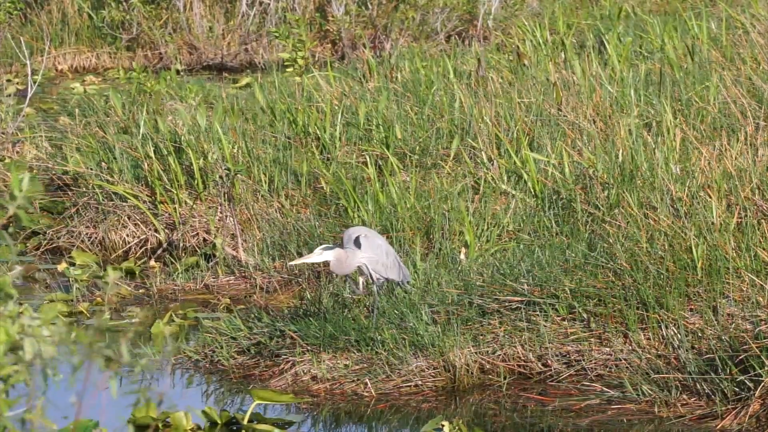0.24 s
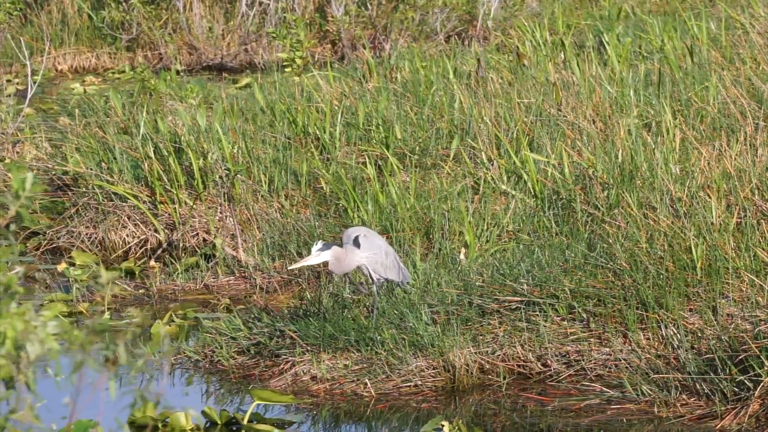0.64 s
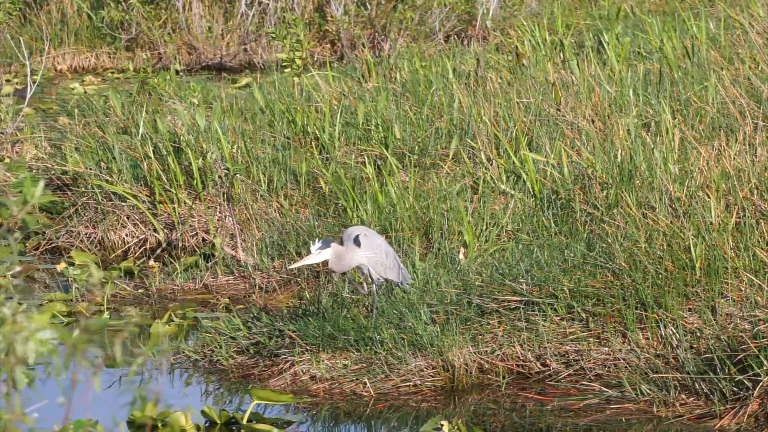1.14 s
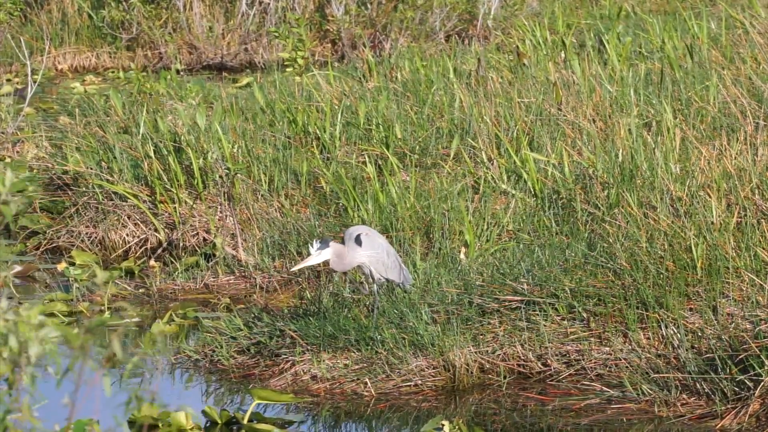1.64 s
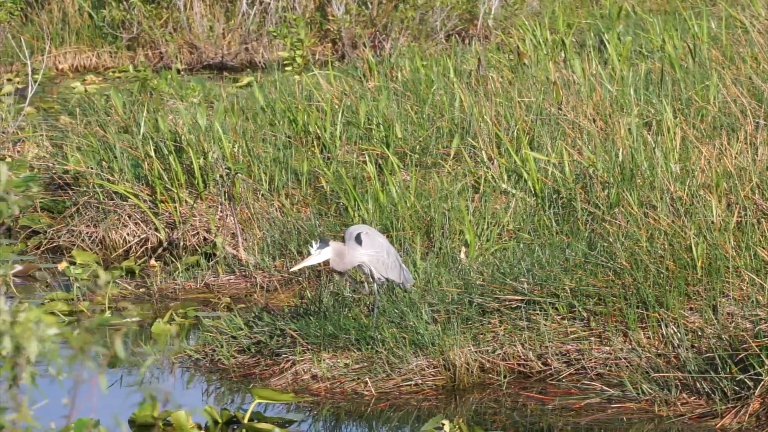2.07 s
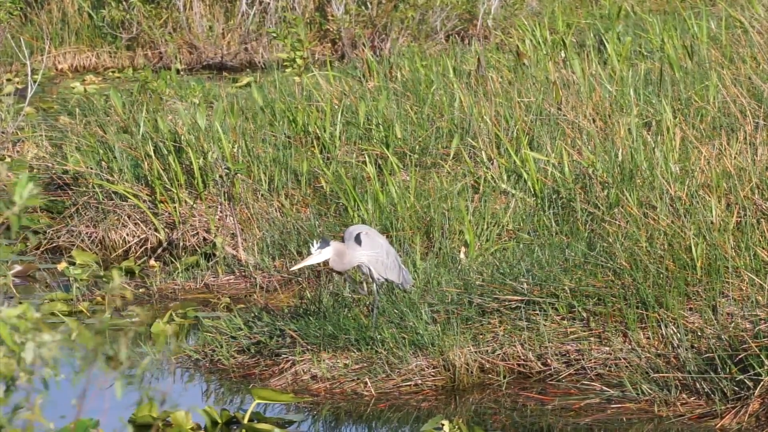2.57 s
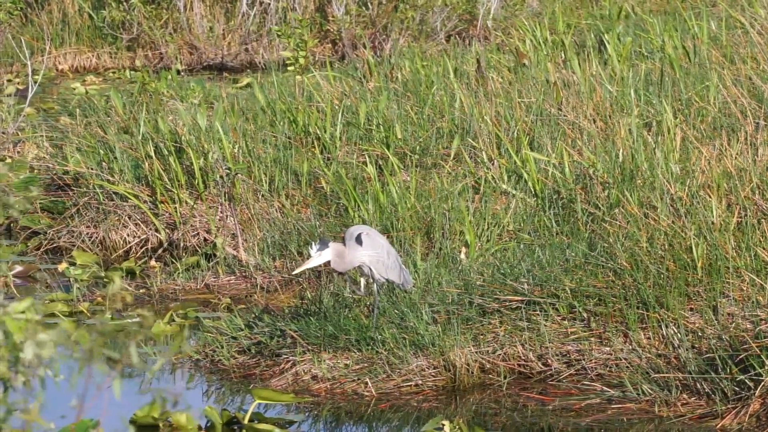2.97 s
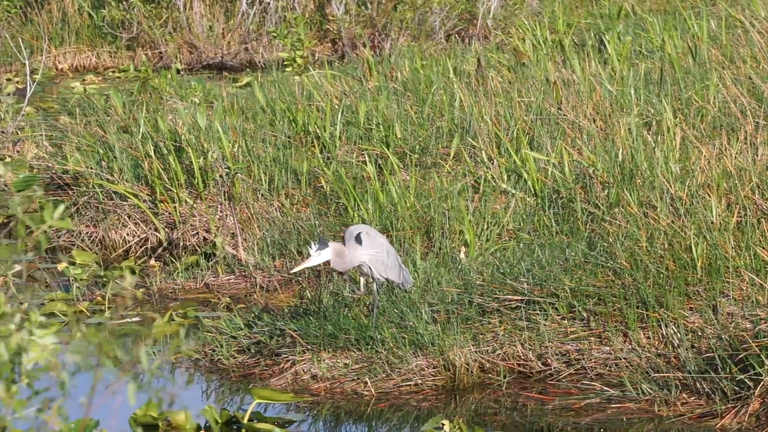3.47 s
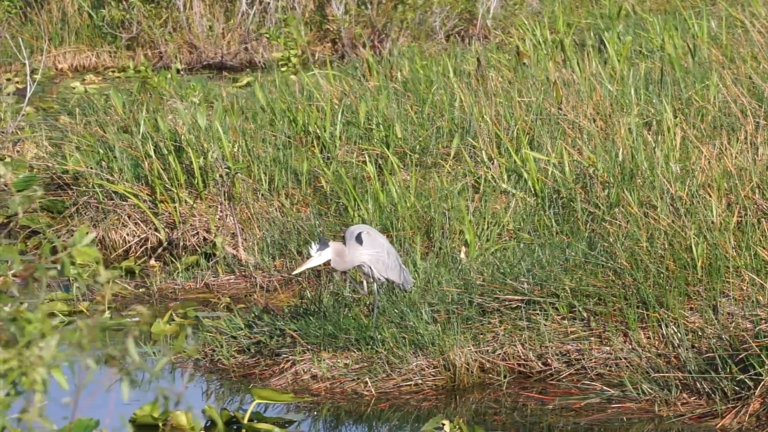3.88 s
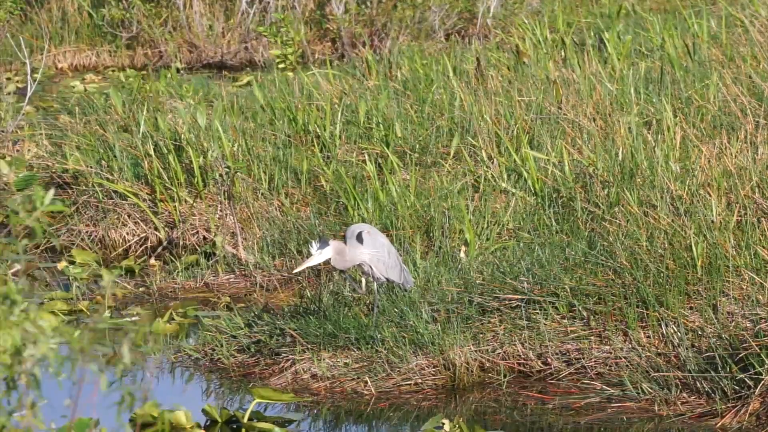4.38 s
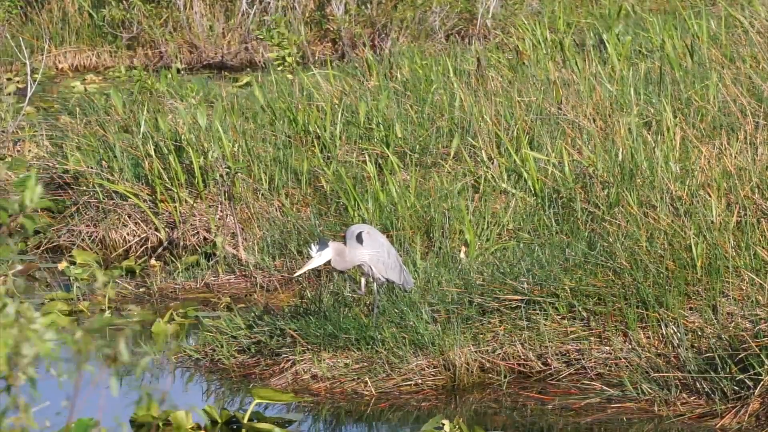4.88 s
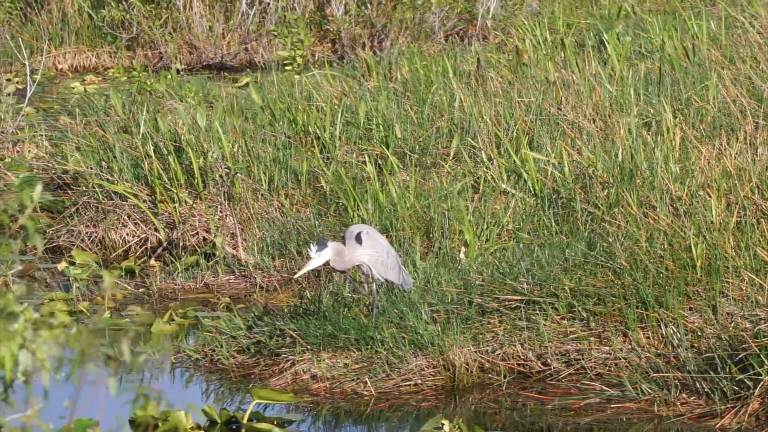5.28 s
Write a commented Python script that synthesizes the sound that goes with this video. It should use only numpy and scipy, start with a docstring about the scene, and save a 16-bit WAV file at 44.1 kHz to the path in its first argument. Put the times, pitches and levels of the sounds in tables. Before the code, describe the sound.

A sunny reed marsh with soft air noise, a continuous cricket trill near 4 kHz and a faint, wavering far engine, slightly stronger at first. A frog cluck starts it, then two nasal waterbird whines swing upward at about 0.2 and 0.55 seconds, followed by weaker reedy notes to 1.5. Small-bird chips, thin whistles with a downward hook, come every quarter to third of a second until 3.9, loudest near 2.5. High raspy buzzes cluster around 0.5, 1.5 and 2.3-2.5, with tiny peeps and chatter between. Short waterbird notes sound near 2.2-2.4, 3.1 and 4.0; another frog clucks at 3.1 and 4.3. The loudest call, a harsh falling wail, bursts at 4.4-4.65, trailing into a weaker wail until 5.1. Breeze then bumps the microphone in low thuds, strongest near 4.86 and 5.44, with a last nasal note at 5.46. Reeds smear the calls briefly.

```python
"""Marsh by day

Gallinules whine and wail in the reeds as sets of harmonics with one picked out by the throat.
Small birds chip and buzz, and short glides peep and chatter, all as gliding sines; a frog clucks
now and then as a brief ringing. A cricket chorus of pulsed tones trills near 4 kHz, a far engine
drones as wavering low lines, and the breeze, mostly late on, bumps the microphone over shaped noise.
The reed bed scatters the calls into short smears of echoes."""
import sys
import numpy as np
from scipy import signal
from scipy.fft import rfft, irfft
from scipy.io import wavfile
from scipy.ndimage import uniform_filter1d, map_coordinates

SR = 44100
rng = np.random.default_rng(int(sys.argv[2]) if len(sys.argv) > 2 else 0)


def unload_audio(sound):
    """Save the sound as a 16-bit wav file, at the path given as the first command line argument."""
    columns = np.transpose(np.atleast_2d(sound))
    # keep every value between -1 and 1, then stretch to whole-number steps
    steps = np.round(np.clip(columns, -1, 1) * 32767)
    wavfile.write(sys.argv[1], SR, steps.astype(np.int16))


N = 243431
T = np.arange(N) / SR  # s

# rising gallinule whines: middle of the rise t/s, low f/Hz, high f/Hz, echo level/dB,
# pitch jitter/share, levels of harmonics 2-5/dB
RISES = [(0.2, 446.6, 596.3, -5.5, 0.016, (-46, -27, 0, -20)),
         (.556, 449, 594.5, -3, 0.021, (-28, -19, 0, -20.5))]
# loudness of each rising whine: t/s, level/dB
RISE_LEVELS = [
    [(0.09, -52), (0.108, -36.5), (0.136, -61), (0.154, -35.5), (0.182, -46), (0.204, -30.5),
     (0.258, -32.5), (0.304, -41), (0.338, -29.5), (0.355, -49)],
    [(0.46, -49.5), (0.488, -58), (0.516, -45.5), (0.548, -52), (0.566, -33.5), (0.6, -46), (0.616, -33),
     (0.676, -49), (0.69, -38), (0.73, -54)],
]
# falling gallinule wails: start f/Hz, end f/Hz, how fast the tone turns pure/(1/s), echo level/dB,
# pitch jitter/share, levels of harmonics from the 2nd up/dB
FALLS = [(918, 585, 2.5, -17, 0.0045, (-15, 0, -25, -24)),
         (640.7, 503, 10, -6.5, .011, (-9.5, -16, 0, -11, -23)),
         (800, 585, 0.5, -13.5, 0.0067, (-15.5, 0, -23, -31))]
# loudness of each falling wail: t/s, level/dB
FALL_LEVELS = [[(3.57, -59), (3.602, -36), (3.686, -67), (3.734, -42), (3.804, -65.5),
               (3.97, -57.5)] + [(4.0, -47), (4.07, -71)], [(4.418, -54), (4.426, -33), (4.476, -19.5),
               (4.482, -31), (4.504, -30), (4.514, -22), (4.548, -30.5), (4.562, -35.5), (4.63, -33.5),
               (4.655, -50)], [(4.655, -41), (4.755, -41), (4.795, -57), (4.823, -46.5), (4.877, -59.5),
               (4.989, -53), (5.023, -39), (5.065, -50.5), (5.115, -49.5), (5.135, -64)]]
# short gallinule notes: t/s, length/s, start f/Hz, end f/Hz, level/dB, echo level/dB,
# pitch jitter/share, levels of harmonics 2-5/dB
NOTES = [(0.743, 0.11, 666, 683, -49, -20, 0.0097, (-15, -17, 0, -2)),
         (.845, .06, 662, 682, -44.5, -8, 0.018, (-25, -24, 0, -9)),
         (1.309, .27, 796, 756, -58.5, -13, 0.0074, (-26, -14, 2, -20)),
         (2.205, 0.064, 771, 751, -39.5, -5, 0.012, (-28, -23, 0, -15)),
         (2.317, 0.059, 768, 762, -44, -7, 0.018, (-25, -16.5, 0, -23)),
         (2.395, 0.12, 730, 692, -55, -7, 0.012, (-28, -20, 0, -13)),
         (3.141, 0.083, 620, 596, -29.5, -13.5, 0.0081, (-44, -39, 0, -47)),
         (3.983, 0.053, 612, 586, -33, -16, 0.0066, (-41, -35, 0, -38)),
         (4.033, 0.031, 617, 599, -31, -7.5, 0.011, (-44, -37, 0, -38)),
         (5.146, 0.096, 712, 677, -52.5, -4, 0.02, (0, -11, -7, -22)),
         (5.464, .09, 658, 604, -31.5, -11, .009, (-18, -5.5, -1, -25))]
# hooked chips of a small bird: end t/s, f before the hook/Hz, level/dB
CHIPS = [(.344, 3840, -43), (.657, 3694, -34), (.942, 3700, -40), (1.770, 3705, -34), (2.014, 3650, -34.5),
         (2.249, 3550, -40.5), (2.478, 3660, -25), (2.725, 3624, -39.5), (3.019, 3670, -45.5),
         (3.355, 3710, -49), (3.667, 3734, -41), (3.922, 3700, -47)]
# slurs of the same bird: t/s, length/s, start f/Hz, end f/Hz, level before the swell shape/dB
SLURS = [(1.077, 0.078, 3960, 2750, -32), (2.133, 0.015, 3740, 2990, -37)]
# syllables of a high buzzing bird: t/s, length/s, middle f/Hz, level before the swell shape/dB
BUZZES = [(0.445, 0.046, 5700, -42), (0.493, 0.074, 5820, -42.5), (.745, 0.012, 5450, -44),
          (1.439, 0.028, 5810, -38.5), (1.496, 0.051, 5580, -38), (1.523, 0.036, 5900, -50),
          (2.261, .012, 5590, -48), (2.284, 0.0091, 5400, -55), (2.459, 0.038, 5900, -40),
          (2.517, 0.029, 6300, -42), (2.537, 0.041, 5740, -42.5), (5.11, 0.026, 6260, -55.5),
          (0.767, 0.099, 5540, -65), (2.296, 0.076, 5600, -63)]
# frog clucks: t/s, f/Hz, peak level/dB, decay/s
CLUCKS = [(0.035, 1620, -23, 0.0011), (3.1086, 1606, -34, 0.0017), (4.316, 1483, -31.5, 0.0027)]
# short glides: peeps, chatter, and strands of the gallinule calls: t/s, length/s, start f/Hz, end f/Hz,
# level before the swell shape/dB
GLIDES = [(.006, 0.018, 2790, 2370, -41), (.197, 0.043, 2720, 2720, -41.5), (0.38, 0.021, 3410, 3470, -46),
          (0.437, 0.0076, 3030, 3450, -40.5), (0.769, 0.0051, 3200, 3430, -34),
          (.783, 0.0091, 3270, 3460, -31), (0.797, 0.0089, 3220, 3310, -32), (.811, .014, 3200, 3170, -38),
          (0.87, 0.0082, 3150, 3280, -39), (1.172, 0.014, 3200, 3110, -46.5),
          (1.225, .024, 2220, 2450, -49.5), (1.342, .03, 2800, 2800, -51), (2.334, 0.054, 3330, 3330, -49),
          (3.122, .016, 2830, 2820, -50), (3.193, 0.028, 930, 1304, -46.5), (3.47, .09, 1745, 1960, -55.5),
          (3.606, .068, 1760, 1744, -47), (3.693, .01, 3140, 2970, -48.5), (3.834, .035, 3110, 2990, -52),
          (3.865, 0.016, 1485, 1390, -47.5), (3.927, 0.055, 3030, 2900, -50.5),
          (4.401, 0.054, 2080, 1980, -42), (4.635, 0.019, 1750, 1600, -43),
          (5.011, 0.034, 2055, 2130, -41.5), (5.068, 0.034, 2850, 2900, -49), (5.15, 0.03, 2840, 2780, -51),
          (5.344, 0.037, 3380, 3520, -52)]
# breeze bumping the microphone: t/s, f/Hz, peak level between the two sides/dB, half length/s
BUMPS = [(0.056, 114, -33, .015), (1.926, 70, -47, 0.0048), (2.949, 81, -33.5, 0.008),
         (3.004, 88, -32.5, 0.0095), (3.823, 79.5, -32.5, 0.011), (4.574, 60, -32, 0.013),
         (4.863, 94, -18, 0.0076), (4.904, 104, -28, 0.012), (4.97, 85, -30.5, 0.0042),
         (5.016, 100.2, -25.5, 0.0045), (5.051, 84, -25.5, 0.015), (5.237, 88.5, -31, 0.0086),
         (5.362, 91, -27, 0.0076), (5.442, 82.5, -21.5, 0.004), (5.496, 84, -28.5, 0.02)]
# far engine, once settled: f/Hz, rms level/dB
DRONE = [(83.5, -53), (117, -49), (233, -53), (249, -53.5)]
# level of the background but for the engine, rising around loud calls,
# used relative to its median: t/s, level/dB
BACKGROUND_LEVEL = [(0.0, -66.5), (0.01, -68.5), (0.47, -73), (0.56, -69.5), (0.95, -73.5), (2.41, -73.5),
                    (2.58, -71), (2.7, -73), (4.37, -73.5), (4.61, -67), (5.08, -75.5), (5.39, -74),
                    (5.45, -76)]
# relative spectrum of the open air: f/Hz, level per Hz/dB
AIR = [(20, -17.5), (40, -15), (60, -3), (95, 0), (130, 2), (175, -6), (275, 1.5), (370, -3), (480, -12),
       (800, -11), (1150, -16), (1800, -22), (3200, -22.5), (5300, -30), (11000, -40)]
# relative spectrum of the air that differs between the ears: f/Hz, level per Hz/dB
WIDTH = [(20, -5), (80, 8), (200, -9), (1000, 4), (2400, 1.5), (5000, -18), (11000, -27)]

RISE_S = 0.0414  # time scale of the swing up in a whine
SCOOP_SHARE, SCOOP_S = 0.0805, 0.0049  # wails and notes start this far flat and slide up
# a note swells from and sinks to the edge level, relative to its own
NOTE_ATTACK_S, NOTE_RELEASE_S, NOTE_EDGE_DB = 0.011, 0.014, -11.5
# a chip swells, holds and stops short, while its pitch sags and ends in a hook
CHIP_ATTACK_S, CHIP_HOLD_S, CHIP_RELEASE_S, CHIP_EDGE_DB = 0.02, 0.021, 0.008, -18.5
CHIP_SAG_HZ_PER_S, CHIP_HOOK_HZ, CHIP_HOOK_S = 2880, 640, 0.0038
CRICKET_HZ, CRICKET_SPREAD_HZ = 3957, 215
CRICKET_DB, AIR_DB, WIDTH_DB = -50.5, -43.5, -71  # rms before the background level moves them
TOP_HZ = 11100


def undb(db):
    """Decibels to gain."""
    return 10 ** (np.asarray(db) / 20)


def unit(x):
    """Scale to rms 1."""
    return x / np.sqrt(np.mean(x ** 2))


def walk(rate):
    """Smooth random wander of rms 1, through rate random points a second."""
    points = rng.standard_normal(4096)
    return unit(map_coordinates(points, [T * rate], order=2, mode='wrap'))


def turn(hz):
    """Phase of a moving frequency."""
    return 2 * np.pi * np.cumsum(hz) / SR


def track(rows):
    """Sample indices, pitch and gain along rows (t/s, f/Hz, level/dB), eased as a voice needs time to change."""
    s, hz, db = np.transpose(rows)
    fade_s = .003
    i = np.flatnonzero((T > s[0] - fade_s) & (T < s[-1] + fade_s))
    t = T[i]
    ends = np.clip(np.minimum(t - s[0], s[-1] - t) / fade_s + 1, 0, 1)
    pitch = uniform_filter1d(np.interp(t, s, hz), size=110)  # 2.5 ms
    gain = uniform_filter1d(undb(np.interp(t, s, db)), size=110)
    return i, pitch, np.sqrt(2) * ends * gain


def envelope(s, attack, length, release, db, edge_db):
    """Attack, hold and release as rows (t/s, level/dB)."""
    hold_end = s + max(attack, length - release)
    return [(s, db + edge_db), (s + attack, db), (hold_end, db), (s + length, db + edge_db)]


def voiced(levels):
    """Sample indices, age and gain of a call whose loudness follows rows (t/s, level/dB)."""
    i, _, gain = track([(s, 0, db) for s, db in levels])
    return i, np.maximum(T[i] - levels[0][0], 0), gain


def reeds(x, t60):
    """Echoes scattered back by countless stems, building up briefly and dying away."""
    t = T[:SR // 2]
    build = 1 - np.exp(-t / .02)
    response = rng.standard_normal(len(t)) * build * np.exp(-np.log(1000) * t / t60)
    return signal.oaconvolve(x, response / np.linalg.norm(response))[:N]


def gallinules(flutter_db=3.0, thinnest_db=-29, swing=0.78):
    """Nasal reedy calls: the throat picks out one harmonic, and the voice shakes, most in the hoarse ones."""
    direct, scattered = np.zeros((2, N))
    shake, flutter = walk(300), flutter_db * walk(130)
    for i, hz, gain, harmonics_db, purify, echo_db, jitter in gallinule_calls():
        phase = turn(hz * (1 + jitter * shake[i]))
        purity = 1 + purify * (T[i] - T[i[0]])  # a harsh start thins to the strongest harmonic
        steadier = gain.max() * (gain / gain.max()) ** swing  # harmonics off the resonance swell less
        call = 0
        for k, db in enumerate(harmonics_db, 2):
            weak = steadier * undb(np.maximum(db * purity, min(db, thinnest_db)))
            strength = gain if db == max(harmonics_db) else weak
            call = call + strength * np.sin(k * phase) * undb(flutter[i])
        direct[i] += call
        scattered[i] += undb(echo_db) * call
    return direct + reeds(scattered, .22)


def gallinule_calls():
    """Whines swing up from one pitch to another; wails and notes scoop in, then slide at an even rate."""
    for (middle, low, high, echo_db, jitter, harmonics_db), levels in zip(RISES, RISE_LEVELS):
        i, _, gain = voiced(levels)
        hz = low + (high - low) * (1 + np.tanh((T[i] - middle) / RISE_S)) / 2
        yield i, hz, gain, harmonics_db, 0, echo_db, jitter
    for (start, end, purify, echo_db, jitter, harmonics_db), levels in zip(FALLS, FALL_LEVELS):
        i, age, gain = voiced(levels)
        hz = np.linspace(start, end, len(i)) * scoop(age)
        yield i, hz, gain, harmonics_db, purify, echo_db, jitter
    for s, length, start, end, db, echo_db, jitter, harmonics_db in NOTES:
        levels = envelope(s, NOTE_ATTACK_S, length, NOTE_RELEASE_S, db, NOTE_EDGE_DB)
        i, age, gain = voiced(levels)
        hz = np.linspace(start, end, len(i)) * scoop(age)
        yield i, hz, gain, harmonics_db, 0, echo_db, jitter


def scoop(age):
    """Pitch ratio of a voice that starts flat and slides up into its note."""
    return 1 - SCOOP_SHARE * np.exp(-age / SCOOP_S)


def chipper(echo_db=-15, t60=0.3, stems_db=-10):
    """Pure whistles that sag and end in a downward hook, and two falling slurs; near stems make them flutter."""
    out = np.zeros(N)
    length = CHIP_ATTACK_S + CHIP_HOLD_S + CHIP_RELEASE_S
    for end, hz, db in CHIPS:
        levels = envelope(end - length, CHIP_ATTACK_S, length, CHIP_RELEASE_S, db, CHIP_EDGE_DB)
        i, age, gain = voiced(levels)
        sag = CHIP_SAG_HZ_PER_S * (age - CHIP_ATTACK_S - CHIP_HOLD_S / 2)
        hook = CHIP_HOOK_HZ * np.exp(np.minimum(T[i] - end, 0) / CHIP_HOOK_S)
        out[i] += gain * np.sin(turn(hz - sag - hook))
    for s, length, start_hz, end_hz, db in SLURS:
        i, hz, gain = track([(s, start_hz, db), (s + length, end_hz, db)])
        out[i] += gain * np.hanning(len(i)) * np.sin(turn(hz))
    stems = undb(stems_db) * reeds(out, 0.07)
    return out + stems + undb(echo_db) * reeds(out, t60)


def buzzer(sweep_hz=290, trill_hz=170, scatter_hz=150, droop_hz=120, echo_db=-8, t60=0.11):
    """A high whistle swept up and down so fast and unevenly that it rasps; each syllable sinks a little."""
    out = np.zeros(N)
    sweep = sweep_hz * np.sin(turn(trill_hz * (1 + 0.26 * walk(150)))) + scatter_hz * walk(700)
    for s, length, hz, db in BUZZES:
        i, pitch, gain = track([(s, hz + droop_hz, db), (s + length, hz - droop_hz, db)])
        swell = np.hanning(len(i)) ** .35
        out[i] += gain * swell * np.sin(turn(pitch + sweep[i]))
    throat = signal.butter(5, (5350, 6500), 'bandpass', fs=SR, output='sos')
    out = signal.sosfilt(throat, out * undb(3.5 * walk(320)))
    return out + undb(echo_db) * reeds(out, t60)


def frog(echo_db=-15, t60=0.14):
    """Each cluck is one push on the vocal sac, which rings for a few cycles."""
    out = np.zeros(N)
    for s, hz, db, decay in CLUCKS:
        age = np.maximum(T - s, 0)
        ring = age / decay * np.exp(1 - age / decay)  # peaks at 1
        out += undb(db) * ring * np.sin(2 * np.pi * hz * age)
    return out + undb(echo_db) * reeds(out, t60)


def short_glides(scatter_hz=60, echo_db=-10, t60=0.27):
    """Peeps, chatter and strands of the gallinule calls, slightly hoarse because their pitch wanders fast."""
    out, hoarse = np.zeros(N), scatter_hz * walk(400)
    for s, length, start_hz, end_hz, db in GLIDES:
        i, hz, gain = track([(s, start_hz, db), (s + length, end_hz, db)])
        swell = np.sqrt(np.hanning(len(i)))
        out[i] += gain * swell * np.sin(turn(hz + hoarse[i]))
    return out + undb(echo_db) * reeds(out, t60)


def crickets(count=15, echo_db=0, high_hz=4880, high_db=-69, thin_hz=5600, thin_db=-70):
    """A chorus loudest at its middle pitch and blurred by the reeds; two thinner insects sing above it."""
    chorus = 0
    for place in np.linspace(-2.4, 2.9, count):
        cricket = trill(CRICKET_HZ + CRICKET_SPREAD_HZ * place, rng.uniform(35, 60))
        chorus = chorus + np.exp(-place ** 2 / 4) * cricket
    chorus = unit(chorus + undb(echo_db) * reeds(chorus, 0.79))
    high = trill(high_hz, 39.5) * undb(3 * walk(6))
    high = unit(high + .5 * reeds(high, 0.05))
    fade_in = np.interp(T, [2.2, 3.4], [0, 1])
    thin = np.sin(turn(thin_hz + 70 * walk(300))) * fade_in
    return undb(CRICKET_DB) * chorus + undb(high_db) * high + undb(thin_db) * thin


def trill(hz, stroke_hz):
    """One cricket: each wing stroke is a short tone that sags in pitch, and the strength of strokes wanders."""
    stroke = turn(stroke_hz * (1 + .1 * walk(20))) / (2 * np.pi) + rng.random()
    cycle = stroke % 1
    strength = undb(3 * walk(30))
    pulse = np.sin(np.pi * cycle) ** 4
    pitch = hz * (1 + 0.038 * (.5 - cycle) + 0.0043 * walk(60))
    return unit(strength * pulse * np.sin(turn(pitch)))


def breeze():
    """Eddies push on the microphone as short low swings of pressure, harder on the right port."""
    out = np.zeros((2, N))
    for s, hz, db, width in BUMPS:
        offset = rng.random() + .05 * rng.standard_normal((2, 1))  # cycles, nearly alike on both sides
        push = undb(db) * np.exp(-((T - s) / width) ** 2)
        out += push * np.cos(2 * np.pi * (hz * (T - s) + offset))
    return out * undb([[-1.2], [1.2]])


def engine(wander=0.0141, fade_db=4.0, early_db=3.0, recede_s=0.9):
    """Low lines that waver and fade on their long way over the marsh, a little louder at first."""
    lines = 0
    for hz, db in DRONE:
        fade = undb(fade_db * walk(8.3))
        tone = np.sin(turn(hz * (1 + wander * walk(24.8))))
        lines = lines + undb(db) * unit(fade * tone)
    return lines * undb(early_db * np.exp(-T / recede_s))


def coloured(points):
    """Air noise of rms 1 with a spectrum of (f/Hz, level/dB) points, joined along log frequency."""
    hz, db = np.transpose(points)
    bins = np.maximum(np.fft.rfftfreq(2 ** 18, 1 / SR), 1)
    gain = undb(np.interp(np.log(bins), np.log(hz), db))
    white = rng.standard_normal(2 * len(bins) - 2)
    return unit(irfft(gain * rfft(white))[:N])


def scene():
    """Nearly everything arrives from straight ahead; only air and breeze differ between the ears."""
    level_db = np.interp(T, *np.transpose(BACKGROUND_LEVEL))
    level = undb(level_db - np.median(level_db))
    background = level * (undb(AIR_DB) * coloured(AIR) + crickets()) + engine()
    ahead = gallinules() + chipper() + buzzer() + frog() + short_glides() + background
    side = undb(WIDTH_DB) * level * coloured(WIDTH)
    return ahead + breeze() + side * np.array([[1], [-1]])


def record(dry):
    """A steep elliptic low-pass cuts the top."""
    low_pass = signal.ellip(10, .2, 80, TOP_HZ, fs=SR, output='sos')
    return signal.sosfilt(low_pass, dry)


dry = scene()
out = record(dry)
unload_audio(out)
```